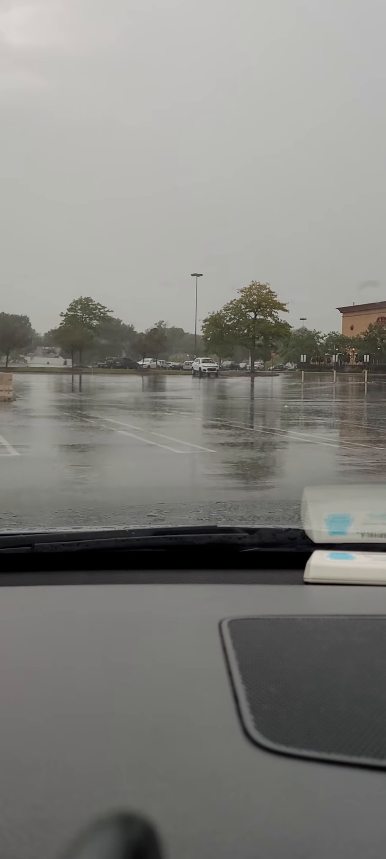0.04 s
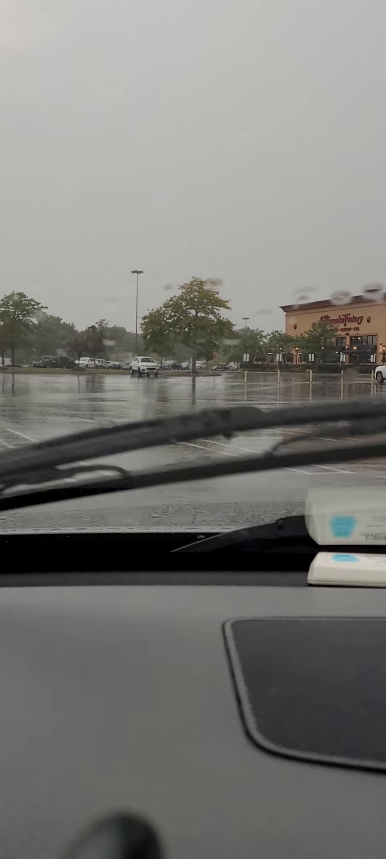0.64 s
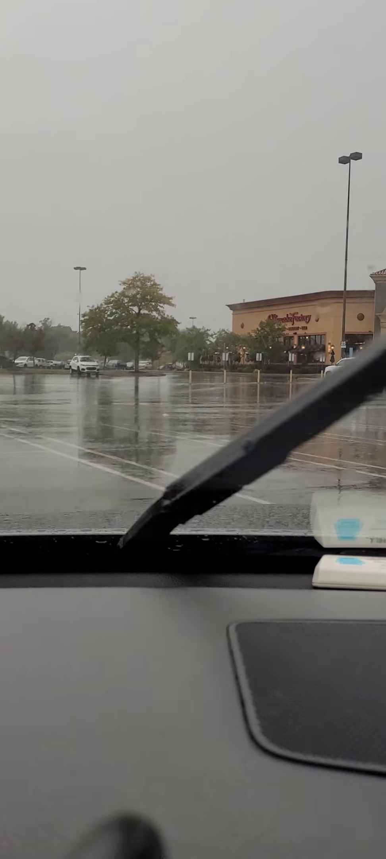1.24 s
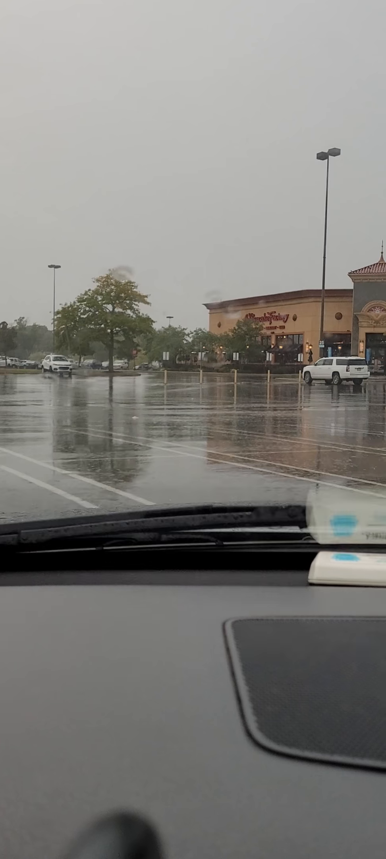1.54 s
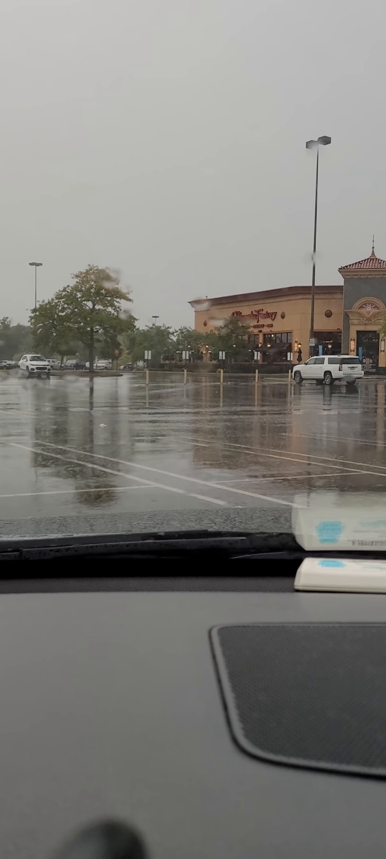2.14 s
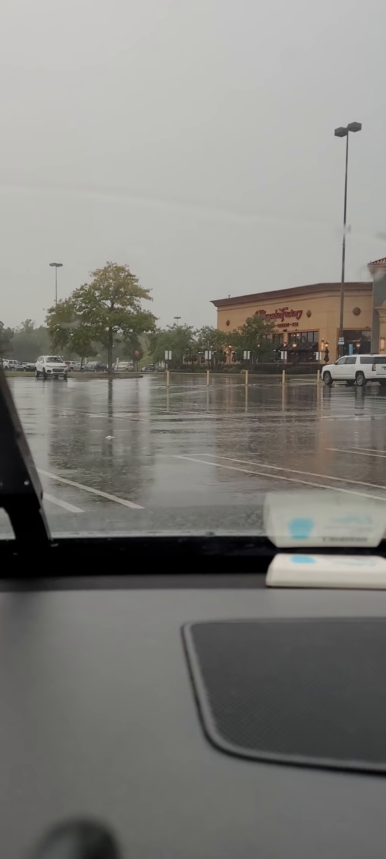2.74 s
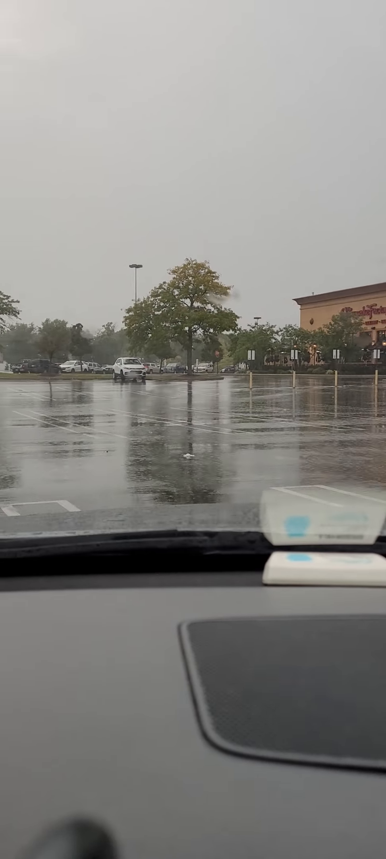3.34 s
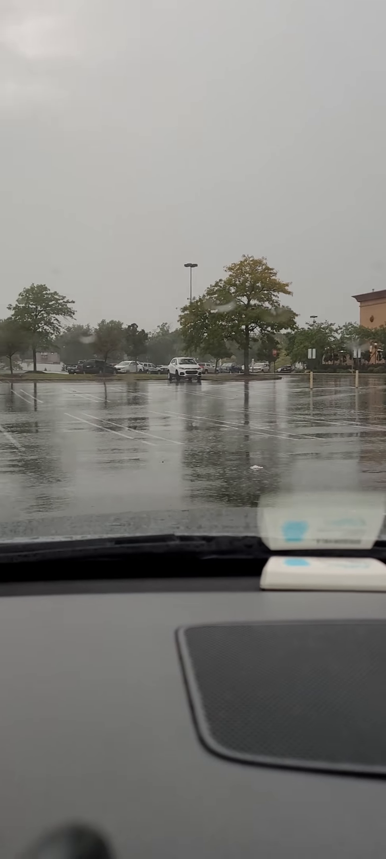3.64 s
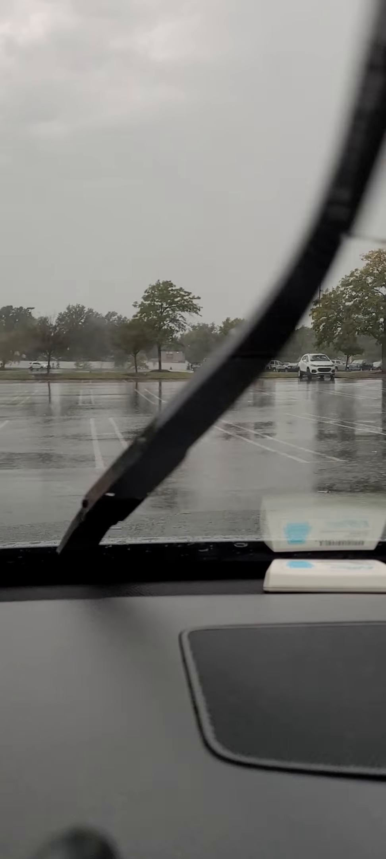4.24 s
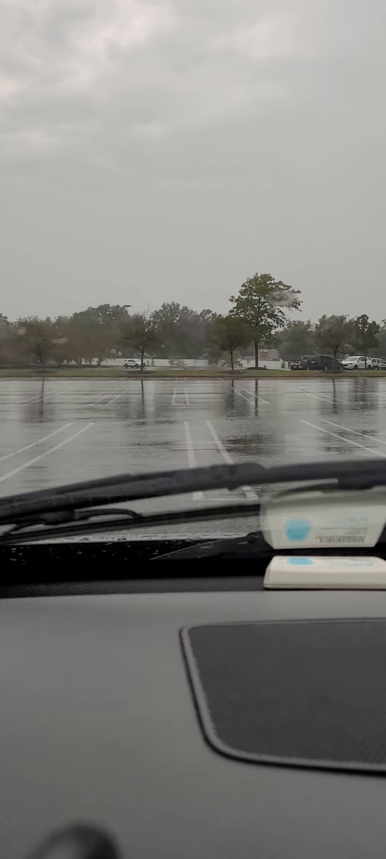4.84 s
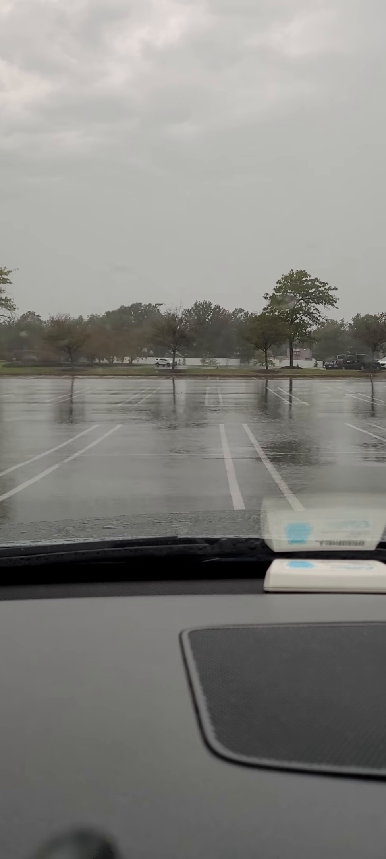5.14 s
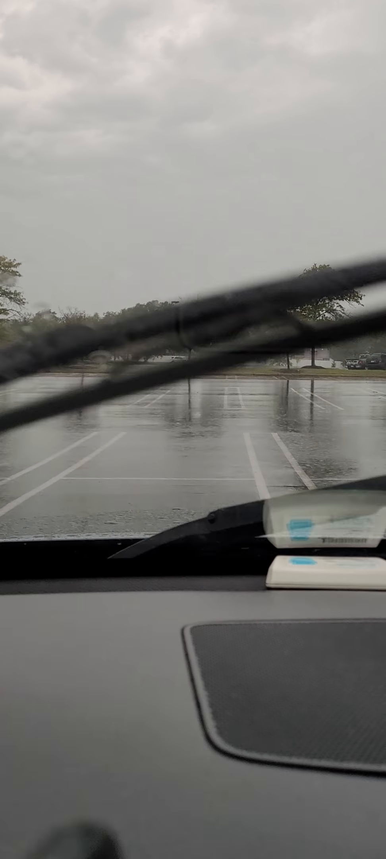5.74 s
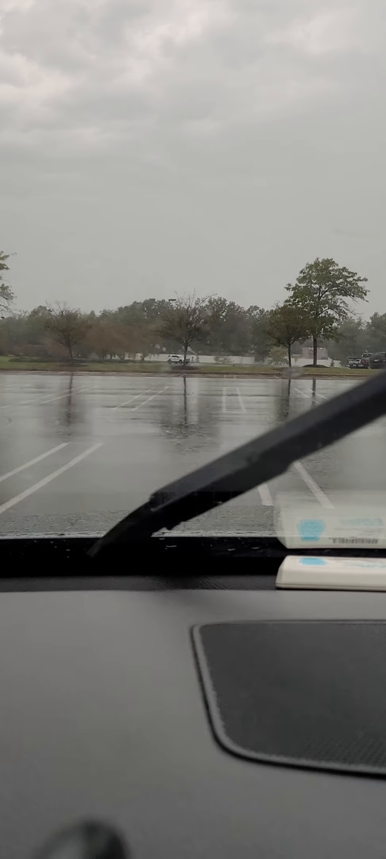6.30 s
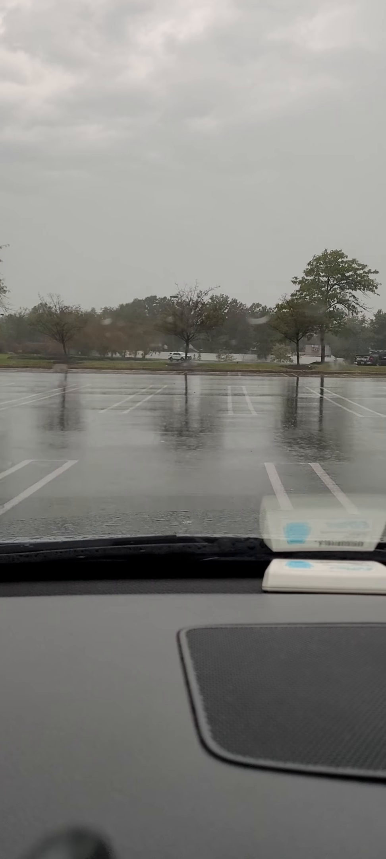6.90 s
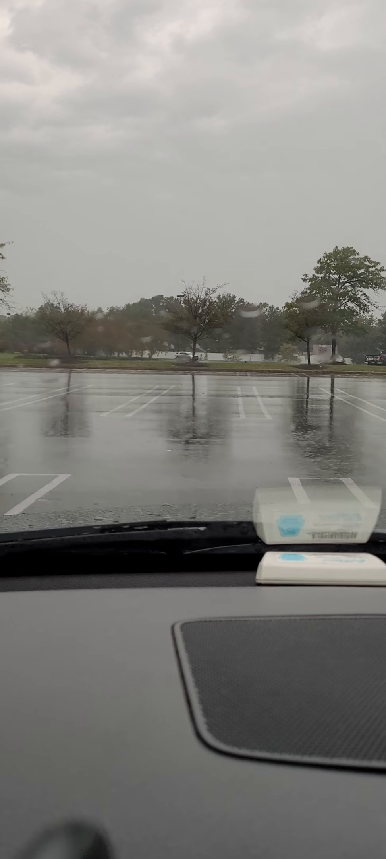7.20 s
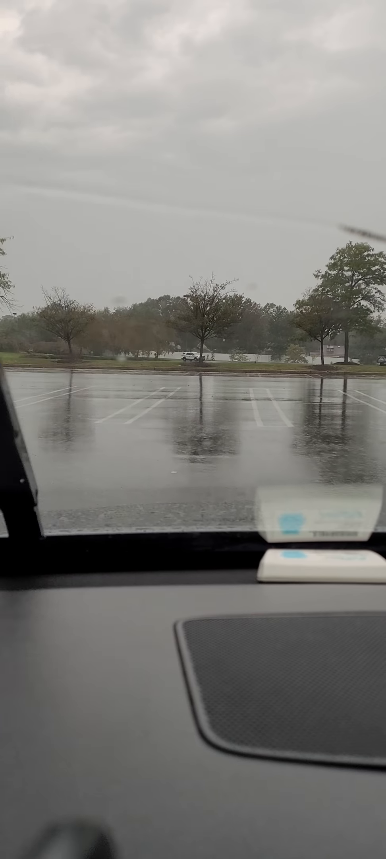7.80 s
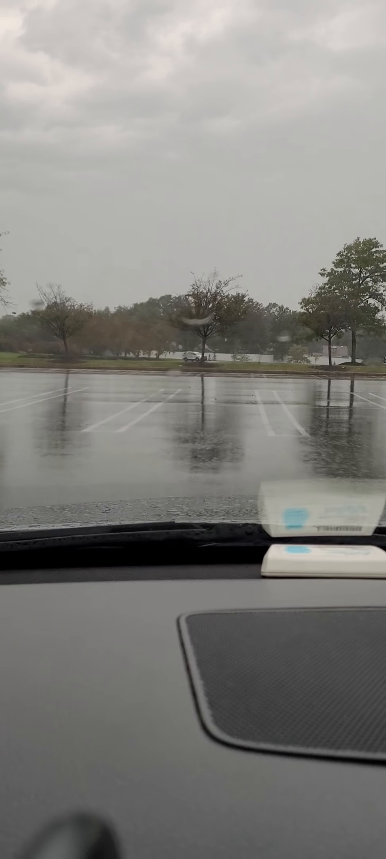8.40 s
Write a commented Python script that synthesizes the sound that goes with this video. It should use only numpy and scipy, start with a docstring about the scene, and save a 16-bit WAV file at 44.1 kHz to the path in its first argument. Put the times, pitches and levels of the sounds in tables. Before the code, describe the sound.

From the start, a deep road rumble, a low engine drone and a dull rush of wet tyres fill the closed cabin of a slowly moving car. Light rain patters on the windscreen, with scattered heavier taps. The wipers start five sweeps at about 0.5, 2.2, 3.9, 5.5 and 7.2 seconds. Each begins with a soft thud, gives a quick cluster of knocks and a dull rubber drag as the blades turn about 0.6 seconds later, then lands with a double thump. Some turns add a dry click. Near 2 seconds the engine rises slightly from idle, then settles. Bumps boom softly through the floor, notably around 1, 3.6 and 5 seconds. A very faint whine comes and goes throughout. The rain is strongest from just after 5 seconds and thins after 7. The wipers land once more at about 8.4 seconds over the continuing rumble.

```python
"""Inside a car creeping across a wet car park in the rain.
From the start, road shake and wet tyres rumble through the closed cabin and rain patters on the glass.
At 0.5 s the wipers begin five sweeps, one every 1.68 s, knocking at each start, turn and landing.
Near 2 s the engine rises from idle, then settles. Bumps boom through the floor and a faint whine
comes and goes throughout. The patter is strongest just after 5 s and thins after 7 s."""
import sys
import numpy as np
from scipy import signal
from scipy.fft import rfft, irfft, next_fast_len
from scipy.io import wavfile
from scipy.ndimage import uniform_filter1d

SR = 44100
rng = np.random.default_rng(int(sys.argv[2]) if len(sys.argv) > 2 else 0)


def digitize_waveform(pressure):
    """Quantize a signal to 16-bit integers and store it at the path in sys.argv[1].

    Rows of a 2-D input are taken as channels; values are limited to [-1, 1].
    """
    field = np.atleast_2d(pressure).T
    bounded = np.clip(field, -1, 1)
    quanta = np.round(bounded * 32767).astype(np.int16)
    wavfile.write(sys.argv[1], SR, quanta)


N = 377496

# Wiper motor takes up the load. Each row: start in s, thud and clack in relative dB, second arm's lag in s.
SWEEP_STARTS = [(0.502, -24, -45, 0.022), (2.196, -25, -42.5, 0.021), (3.869, -25, -43.5, 0.038),
                (5.538, -26, -46, 0.024), (7.223, -22, -41.5, 0.027)]
# Cabin stereo balance. Each row: frequency in Hz, left over right in dB.
BALANCE = [(30, -2), (70, -2), (140, 0), (280, 2.5), (500, -0.5), (610, 3.5), (710, 0.5), (840, 3.5),
           (1000, 3), (1200, 3.5), (1900, 4.5), (3000, 7.5), (3700, 4.5), (4500, 2.5), (6000, -2),
           (8000, -.5), (12000, 1), (15500, -1)]
# Likeness of the two sides. Each row: frequency in Hz, correlation.
CORRELATION = [(40, 0.53), (130, 0.72), (280, 0.88), (500, 0.68), (900, 0.015), (3000, 0), (16000, 0)]


def road_rumble(panel_waver_db=1.35, jolt_db=5.5, jolt_lag_s=0.041):
    """Road shake fills the low cabin resonances and hums in the panels; each wiper start jolts the panels."""
    # Each row: time in s, level in dB.
    road_levels = [(0, -31), (0.45, -31), (0.8, -29.5), (2.1, -28.5), (2.7, -28), (3.6, -30), (4.4, -30),
                   (5.1, -31), (6, -28.5), (6.9, -30.5), (7.3, -30), (7.9, -30.5), (8.56, -31)]
    panel_levels = [(0, -42), (0.55, -38), (0.75, -41.5), (1.3, -44), (2.2, -40), (2.8, -40), (3.25, -40),
                    (3.42, -32.5), (3.9, -40.5), (4.4, -39), (4.75, -43.5), (5.0, -39), (5.6, -40.5),
                    (6.8, -41), (7.3, -39), (7.7, -41.5), (8.2, -43), (8.56, -41.5)]
    # Each row: frequency in Hz, relative density in dB.
    road_colour = [(18, -19), (28, -15), (35, -6.5), (47, 6.5), (56, 1.5), (68, 8), (84, 4), (96, 4),
                   (110, 2), (135, -10.5)]
    panel_colour = [(100, -11), (115, 6.5), (130, -1.5), (143, 1.5), (160, 5), (172, 2), (190, -10.5)]
    jolts = sum(swell(s + jolt_lag_s, half_width_s=0.038) for s, *_ in SWEEP_STARTS)
    panel_db = curves(panel_levels)[0] + jolt_db * jolts + panel_waver_db * drift(rate_hz=1.43)
    shake = cabin_noise(road_colour)
    power = uniform_filter1d(np.mean(shake ** 2, axis=0), SR // 6)
    shake = unit_rms(shake / power ** .25)  # halves the random swings in dB
    return from_db(curves(road_levels)[0]) * shake + from_db(panel_db) * cabin_noise(panel_colour)


def bumps():
    """Each bump in the asphalt sets one low cabin resonance booming for a few cycles."""
    # Each row: centre in s, half-width in s, pitch in Hz, level in dB.
    booms = [(0.22, 0.037, 72, -27), (0.6, 0.024, 68, -24), (0.95, 0.029, 72, -21), (1.7, 0.04, 66, -24),
             (2.65, 0.063, 68, -24.5), (3.05, 0.071, 44.06, -31), (3.6, 0.11, 46.8, -25),
             (3.679, 0.12, 65.05, -26.5), (3.985, 0.011, 78, -20.5), (4.067, 0.01, 80, -19.5),
             (4.243, 0.015, 72, -22), (5.08, 0.06, 45.04, -26), (5.085, 0.034, 79.95, -24.5),
             (6.88, 0.03, 66, -25.5), (7.37, 0.085, 46.96, -35), (7.53, 0.046, 67.4, -27.5),
             (8.125, 0.011, 70, -20.5), (8.235, 0.0095, 77.8, -21)]
    t, out = np.arange(N) / SR, 0
    for s, half_width_s, hz, db in booms:
        phase = rng.uniform(0, 2 * np.pi)
        out += from_db(db) * swell(s, half_width_s) * np.sin(2 * np.pi * hz * t + phase)
    return np.sqrt(2) * out * from_db([[-.6], [.6]])


def wipers(scatter_db=1.5, detune=0.035, build_cycles=2.84):
    """Each knock rings arms, glass and dash: low modes follow its thud, high modes its clack."""
    # Each row: frequency in Hz, relative level in dB, t60 in s.
    modes = [(130, 1.5, 0.17), (214.1, 1, 0.11), (250, 4, 0.089), (299.4, 3.5, 0.05), (349.6, -3, 0.069),
             (431, 1, 0.086), (505, 2, 0.043), (617, -1.5, 0.045), (707, -4.5, 0.041), (838, -6, 0.036),
             (1125, -11, 0.03), (1280, -14, 0.024), (1700, -21, 0.025)]
    out, t = np.zeros((2, N)), np.arange(SR // 6) / SR
    hz, mode_db, t60_s = np.transpose(modes)
    clack_share = np.clip(np.log2(hz / 330) / 0.34, 0, 1)
    half_gap_rad = np.arccos(np.clip(at_hz(CORRELATION, hz), -1, 1)) / 2  # phase between the sides
    pan_db = at_hz(BALANCE, hz) / 2
    build = 1 - np.exp(-np.outer(hz, t) / build_cycles)  # rubber pushes softly
    envelope = build * from_db(-60 * t / t60_s[:, None])
    for s, thud_db, clack_db in wiper_knocks():
        strength, shift, phase, lead = rng.standard_normal((4, len(hz)))
        drive_db = (1 - clack_share) * (thud_db - 4) + clack_share * (clack_db + 3)
        db = mode_db + drive_db + scatter_db * strength
        angle = 2 * np.pi * (np.outer(hz * (1 + detune * shift), t) + phase[:, None])
        offset = (half_gap_rad * np.sign(lead))[:, None]
        pair = [from_db(db + side * pan_db) @ (envelope * np.sin(angle + side * offset)) for side in (1, -1)]
        add(out, s, np.array(pair))
    return out


def wiper_knocks(rebound_s=0.00893, rebound_db=-3, second_arm_db=-0.5, judder_lag_s=0.66):
    """The arms start in turn; the blades flip and rebound at the top, judder back and land in turn."""
    # Each row, here and in the result: time in s, thud and clack in relative dB.
    flips = [(1.038, -29, -46), (1.077, -31, -41), (1.107, -30, -45), (1.138, -21.5, -39),
             (2.730, -22, -39), (2.768, -34, -39), (2.786, -28, -47), (2.815, -28.5, -40),
             (4.418, -39, -38), (4.452, -29, -42), (4.474, -30, -45), (4.503, -25, -37.5),
             (6.085, -36, -48), (6.112, -25, -39), (6.133, -23.5, -44), (6.169, -29, -34),
             (7.767, -18.5, -38), (7.810, -23, -41), (7.848, -21.5, -47), (7.868, -34, -42)]
    landings = [(0.015, -26.5, -37.5), (0.042, -27.5, -37), (1.678, -21.5, -37), (1.712, -21.5, -39),
                (3.372, -30, -37), (3.398, -34, -44), (5.05, -25.5, -45), (5.074, -26, -36),
                (6.719, -20.5, -41), (6.733, -26, -39), (6.755, -29, -44), (8.407, -29, -44),
                (8.423, -34.5, -37.5)]
    rebounds = np.array(flips) + [rebound_s, rebound_db, rebound_db]
    first_arm = np.array(SWEEP_STARTS)[:, :3]
    second_arm = [(s + lag_s, thud_db + second_arm_db, clack_db + second_arm_db)
                  for s, thud_db, clack_db, lag_s in SWEEP_STARTS]
    judders = [(s + judder_lag_s, -24, -62) for s, *_ in SWEEP_STARTS]
    return np.vstack([flips, rebounds, first_arm, second_arm, judders, landings])


def engine(waver_db=2):
    """The firing note rises from idle as the car pulls away, then settles."""
    # Each row: time in s, firing rate in Hz, level in dB.
    firing = [(0, 34.2, -38), (0.8, 35.57, -31.5), (1.25, 36.8, -34), (1.7, 46.5, -36), (2.3, 46.1, -28.5),
              (2.6, 42.85, -36), (3.1, 38.26, -31), (3.45, 33, -33.5), (3.9, 32.07, -44), (4.3, 35.8, -34),
              (4.6, 37.2, -37), (5, 35.2, -33), (8.2, 34.5, -35), (8.56, 30.8, -43)]
    hz, db = curves(firing)
    return from_db(db + waver_db * drift(rate_hz=5.5)) * tone(hz, waver=0.011) * from_db([[-1.2], [1.2]])


def drivetrain(throb_db=3.5):
    """The drivetrain drones with an uneven throb."""
    # Each row: time in s, pitch in Hz, level in dB.
    drone = [(0, 88.4, -34.5), (0.3, 88.1, -30.5), (0.45, 87, -41), (0.75, 84.75, -38),
             (0.95, 84.36, -28.5), (1.45, 83, -35), (1.8, 83.06, -30), (2.25, 77, -35), (2.65, 73, -34),
             (3.3, 71, -38), (3.95, 80, -34.5), (4.4, 81, -38.5), (4.85, 81.05, -30.5), (5.25, 81.4, -38),
             (5.75, 80.4, -28.5), (6.2, 77.9, -31.5), (6.65, 75.83, -33.5), (7.15, 74, -33.5),
             (7.35, 70.06, -48), (8.56, 69.5, -49.5)]
    hz, db = curves(drone)
    return from_db(db + throb_db * drift(rate_hz=5.5)) * tone(hz, waver=0.014) * from_db([[-.5], [.5]])


def rubbing(flutter_db=0.9, drag_db=-41, drag_lag_s=0.59):
    """Wet tyres and rubber blades give a dull, uneven rush; the rubber drags at the top of each sweep."""
    # Each row: time in s, level in dB.
    rush_levels = [(0, -43), (0.8, -42.5), (1.5, -41.5), (2.5, -42), (3.3, -41.5), (3.65, -43),
                   (4.2, -42.5), (6.8, -43.5), (7.7, -44), (8.56, -46.5)]
    # Each row: frequency in Hz, relative density in dB.
    rush_colour = [(160, -10), (190, -2.5), (235, 0.5), (280, -5), (350, -5.5), (450, -13.5), (560, -17),
                   (700, -17.5), (860, -20), (990, -25), (1130, -23), (1300, -29.5), (1500, -29),
                   (2500, -37.5)]
    drag_colour = [(220, -3), (270, 0.5), (400, -8.5), (510, -6.5), (620, -13)]
    rush = cabin_noise(rush_colour) * from_db(curves(rush_levels)[0] + flutter_db * drift(rate_hz=20))
    turns = sum(swell(s + drag_lag_s, half_width_s=0.063) for s, *_ in SWEEP_STARTS)
    return rush + from_db(drag_db) * turns * cabin_noise(drag_colour)


def rain(drops_per_s=1400, ticks_per_s=330, wash_db=-1):
    """Heavier rain brings more drops on the glass; tiny droplets tick and sizzle above them."""
    # Each row: time in s, relative level in dB.
    patter_levels = [(0, -58.5), (0.8, -57), (1.3, -58.5), (2.3, -57.5), (2.65, -58), (2.88, -60),
                     (3.15, -60), (3.35, -57.5), (3.6, -62), (4.2, -58), (4.36, -59), (4.76, -57.5),
                     (4.9, -62), (5.05, -56), (5.22, -53), (5.5, -54.5), (5.8, -56), (5.96, -55.5),
                     (6.08, -60.5), (6.2, -60.5), (6.42, -56.5), (6.58, -54.5), (6.85, -55), (7.12, -57),
                     (7.25, -60.5), (7.57, -66.5), (7.7, -63.5), (8.3, -66.5), (8.36, -60.5), (8.56, -63)]
    spray_levels = [(0, -69.5), (0.9, -67.5), (1.5, -68), (2.6, -68), (2.8, -74), (3.0, -66), (3.25, -69),
                    (3.6, -72), (3.85, -72), (4.12, -65), (4.35, -71), (4.7, -62), (4.93, -72),
                    (5.13, -62.5), (5.7, -65), (5.96, -71), (6.08, -68), (6.28, -67), (6.5, -63),
                    (7.13, -68.5), (7.22, -72), (7.7, -67), (8.15, -66.5), (8.56, -72)]
    # Each row: frequency in Hz, relative density in dB.
    patter_colour = [(600, 6.5), (1000, 1.5), (1500, 0.5), (1900, 2), (2350, -1.5), (2650, 2.3),
                     (3000, 1.4), (3600, 0.65), (4500, -3), (5500, -4.5), (6600, -9.5), (7900, -11),
                     (8700, -16), (11500, -15.5), (15000, -21.5)]
    spray_colour = [(3500, -9), (5000, -1), (7800, 2), (8800, -1.5), (11800, .5), (13700, -1.5), (15700, 1)]
    surge_db = 0.89 * drift(rate_hz=9)
    patter_db, spray_db = curves(patter_levels)[0] + surge_db, curves(spray_levels)[0] + surge_db
    flow = from_db(patter_db - np.mean(patter_db))
    taps = patter(drops_per_s * flow, spread_db=3.7, t60_s=.013) / np.sqrt(flow)
    ticks = patter(ticks_per_s, spread_db=4.6, t60_s=.011)
    wash, mist = rng.standard_normal((2, 2, N))  # countless small, far drops merge
    glass = in_cabin(taps + from_db(wash_db) * wash, patter_colour)
    spray = in_cabin(ticks + .5 * taps + 1.8 * mist, spray_colour)
    return from_db(patter_db + 4.5) * glass + from_db(spray_db + 2.5) * spray


def patter(per_s, spread_db, t60_s, patches=8):
    """Drops of random size land on several patches of glass, each with its own reflections."""
    onsets = np.flatnonzero(rng.random(N) < per_s / SR)
    sizes = from_db(spread_db * np.minimum(rng.exponential(1, len(onsets)), 4))
    patch, out = rng.integers(0, patches, len(onsets)), 0
    for k in range(patches):
        taps = np.zeros((1, N))
        taps[0, onsets] = sizes * (patch == k)
        out += signal.oaconvolve(taps, reflections(t60_s), axes=1)[:, :N]
    return unit_rms(out)


def heavy_drops(flatten_s=.0015):
    """Fat drops tap the glass as they flatten, with a bright tick as they burst."""
    # Each row: time in s, tap and tick in relative dB.
    drops = [(0.155, -47, -46), (0.2894, -52, -44.5), (0.393, -52, -45), (0.7764, -48, -43),
             (0.957, -48, -43), (1.0164, -56, -49), (1.674, -38, -44), (2.008, -52, -49), (3.127, -56, -47),
             (3.1545, -54, -47), (4.2714, -46, -66), (4.9424, -48, -52), (5.048, -39, -66),
             (5.413, -53, -60), (5.7134, -47, -39), (6.471, -52, -46), (6.804, -50, -45), (7.359, -56, -52),
             (7.5034, -54, -49), (7.626, -41.5, -56), (7.808, -45, -62), (8.3854, -43, -70)]
    out = np.zeros((2, N))
    for s, tap_db, tick_db in drops:
        tap = band_tap(band_hz=[1240, 2660], t60_s=.07) * from_db([[7], [2]])
        tick = band_tap(band_hz=[5000, 12500], t60_s=.028)
        attack = 1 - np.exp(-np.arange(tap.shape[1]) / SR / flatten_s)
        add(out, s, attack * (from_db(tap_db) * tap + from_db(tick_db) * tick))
    return out


def arm_clicks():
    """On some flips the blade holder snaps against its arm, short and dry."""
    # Each row: time in s, relative peak in dB.
    snaps = [(2.769, -43), (6.124, -41), (6.170, -37.5), (6.178, -35), (7.811, -42)]
    out = np.zeros((2, N))
    for s, db in snaps:
        click = band_tap(band_hz=[480, 814], t60_s=.043)
        add(out, s, from_db(db + 3.5) * click / np.abs(click).max() * from_db([[1], [-1]]))
    return out


def engine_pull(level_db=-52):
    """A soft rush while the engine pulls."""
    # Each row: frequency in Hz, relative density in dB.
    colour = [(440, 1), (500, 2), (620, -6), (760, -10)]
    return from_db(level_db) * swell(s=1.907, half_width_s=0.15) * cabin_noise(colour)


def blade_swish():
    """On one return sweep the rubber shears the water film with a high, thin hiss."""
    # Each row: time in s, level in dB.
    levels = [(4.36, -95), (4.45, -63), (4.6, -64), (4.76, -66), (4.88, -93)]
    # Each row: frequency in Hz, relative density in dB.
    colour = [(10500, -6), (12000, -4), (13500, -2), (15600, -3)]
    return from_db(curves(levels)[0]) * cabin_noise(colour) * from_db([[-1], [1]])


def whine():
    """A faint whine comes and goes, a little to the right."""
    # Each row: time in s, pitch in Hz, level in dB.
    course = [(0, 1102, -66), (1.55, 1126, -74), (1.7, 1196, -66), (3.4, 1212, -65.5), (3.9, 1224, -79),
              (5.5, 1208, -70.5), (8.56, 1221, -72.5)]
    hz, db = curves(course)
    return from_db(db) * tone(hz, waver=0.00544) * from_db([[-1.5], [0]])


def in_cabin(pair, colour, skirt_db_per_octave=-36):
    """Colour two unrelated signals, at unit power; long waves reach both sides alike, short ones do not."""
    size = next_fast_len(pair.shape[1])
    hz, sides = np.arange(size // 2 + 1) * SR / size + 1e-6, np.array([[1], [-1]])
    mid, side = rfft(pair, size)
    alike = np.clip(at_hz(CORRELATION, hz), -1, 1)
    spectra = np.sqrt(1 + alike) * mid + np.sqrt(1 - alike) * side * sides
    octaves_outside = np.abs(np.log2(hz / np.clip(hz, colour[0][0], colour[-1][0])))
    gain_db = at_hz(colour, hz) + skirt_db_per_octave * octaves_outside + sides * at_hz(BALANCE, hz) / 2
    return unit_rms(irfft(spectra * from_db(gain_db), size)[:, :pair.shape[1]])


def cabin_noise(colour):
    """Steady coloured noise in the cabin."""
    return in_cabin(rng.standard_normal((2, N)), colour)


def reflections(t60_s):
    """The close cabin walls scatter a tap into a brief burst."""
    t = np.arange(SR // 16) / SR
    return rng.standard_normal((2, len(t))) * from_db(-60 * t / t60_s)


def band_tap(band_hz, t60_s):
    """A scattered tap confined to one band."""
    return signal.sosfilt(signal.butter(2, band_hz, "band", fs=SR, output="sos"), reflections(t60_s))


def tone(hz, waver):
    """Unit-power sine whose pitch wanders by the fraction waver."""
    return np.sqrt(2) * np.sin(2 * np.pi * np.cumsum(hz * (1 + waver * drift(rate_hz=4.94))) / SR)


def drift(rate_hz, hop=40):
    """Slow random motion of unit RMS."""
    pole = np.exp(-2 * np.pi * hop * rate_hz / SR)
    slow = signal.lfilter([1], [1, -2 * pole, pole ** 2], rng.standard_normal(N // hop + 2002))[2000:]
    return np.interp(np.arange(N) / hop, np.arange(len(slow)), unit_rms(slow))


def swell(s, half_width_s):
    """Gaussian hump of height 1 at time s."""
    return np.exp(-((np.arange(N) / SR - s) / half_width_s) ** 2)


def curves(rows):
    """Each column after the time column, at every sample."""
    s, *columns = np.transpose(rows)
    return [np.interp(np.arange(N) / SR, s, column) for column in columns]


def at_hz(points, hz):
    """Read a spectrum on a log-frequency axis."""
    points_hz, values = np.transpose(points)
    return np.interp(np.log(np.maximum(hz, 1)), np.log(points_hz), values)


def add(track, s, sound):
    """Mix a short stereo sound in at time s."""
    start = max(round(s * SR), 0)
    track[:, start:start + sound.shape[1]] += sound[:, :N - start]


def from_db(db):
    """Decibels to gain."""
    return 10 ** (np.asarray(db) / 20)


def unit_rms(x):
    """Scale to unit power."""
    return x / np.sqrt(np.mean(x ** 2) + 1e-20)


def scene():
    """Everything heard from behind the dashboard."""
    car = road_rumble() + bumps() + engine() + drivetrain() + whine() + engine_pull()
    return car + rubbing() + wipers() + arm_clicks() + blade_swish() + rain() + heavy_drops()


def record(dry):
    """Sound reaches the right side just after the left; the top is cut steeply."""
    lag_s, cutoff_hz = 0.00015, 15800
    right = np.pad(dry[1], (round(lag_s * SR), 0))[:N]
    lowpass = signal.ellip(12, .1, 80, cutoff_hz, fs=SR, output="sos")
    return signal.sosfilt(lowpass, np.array([dry[0], right]))


dry = scene()
out = record(dry)
digitize_waveform(out)
```